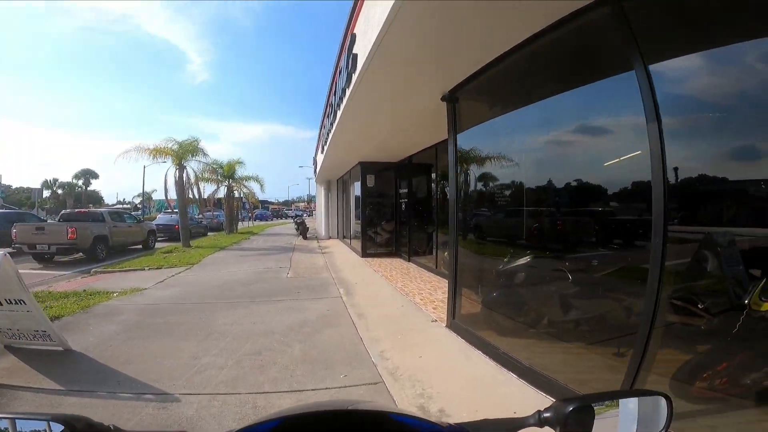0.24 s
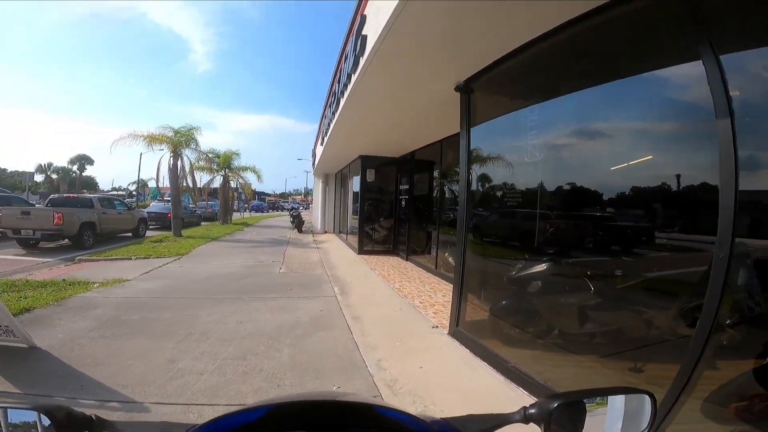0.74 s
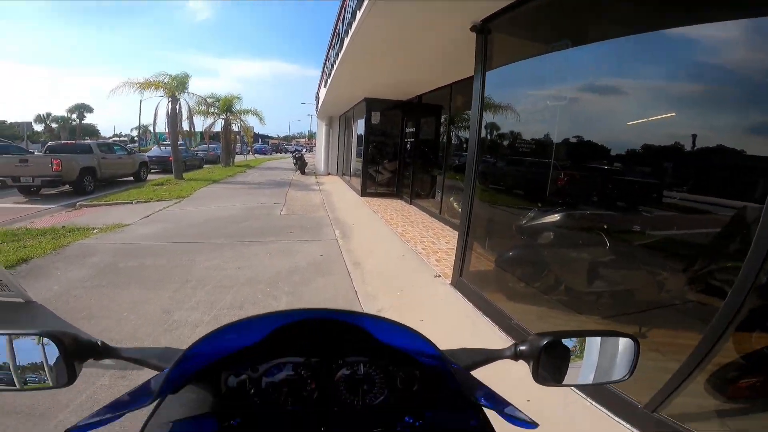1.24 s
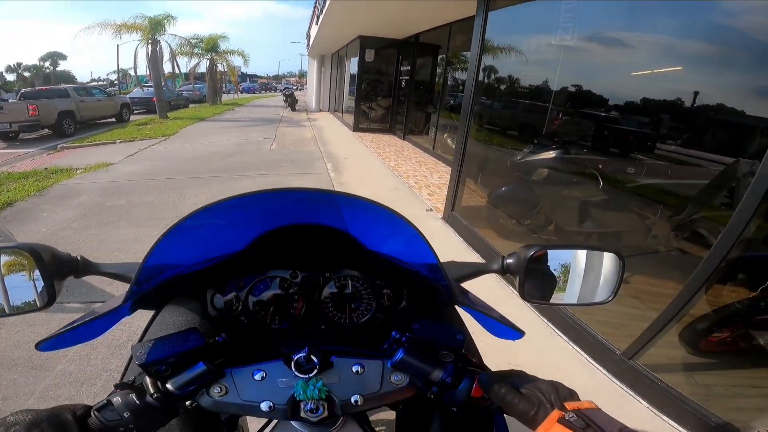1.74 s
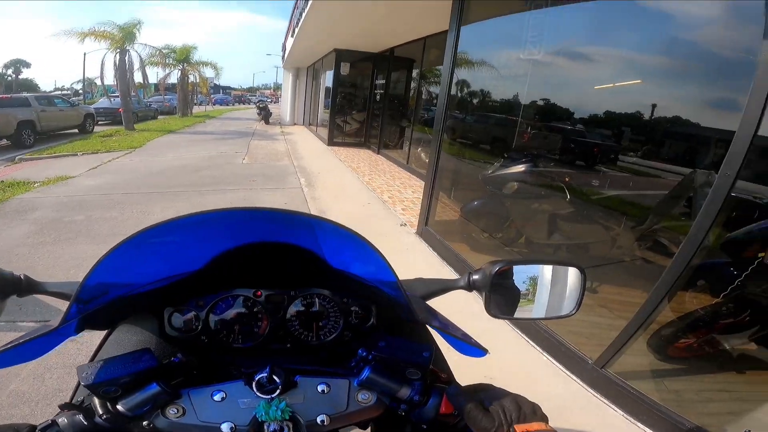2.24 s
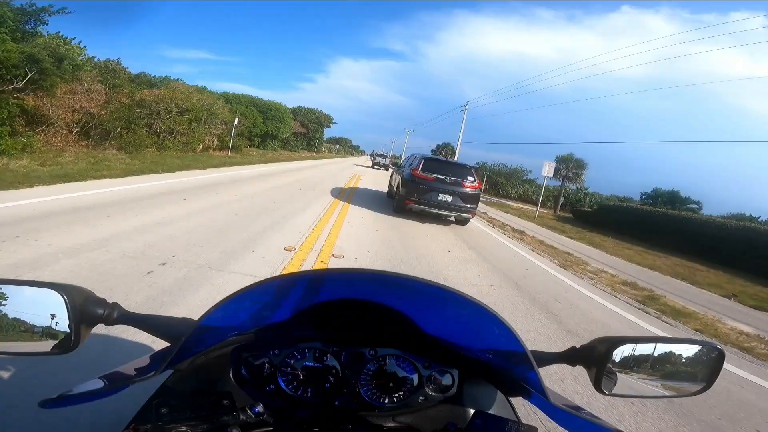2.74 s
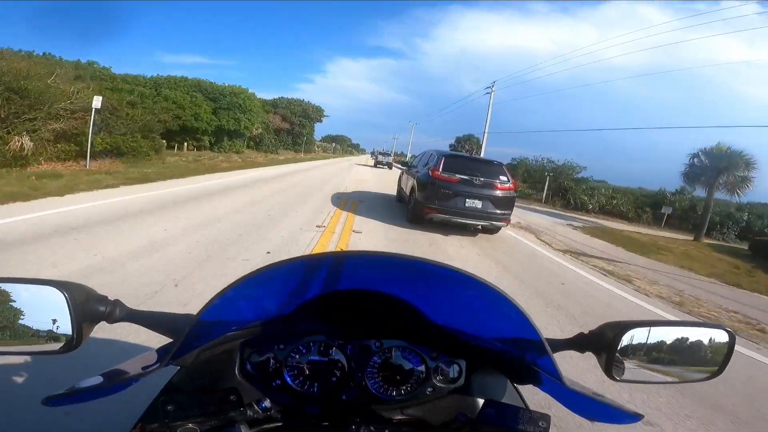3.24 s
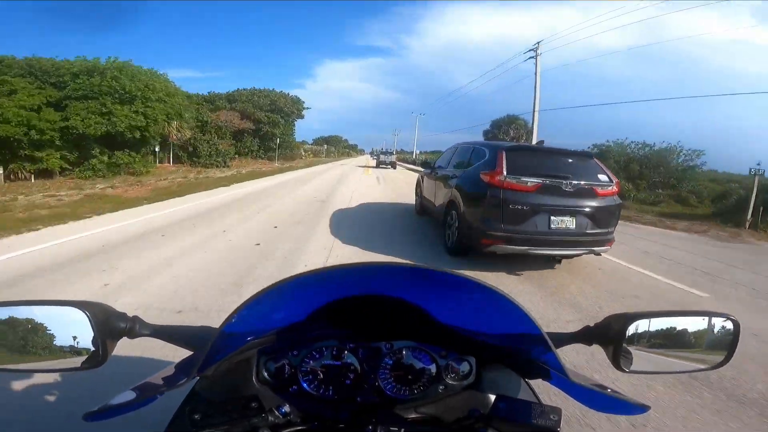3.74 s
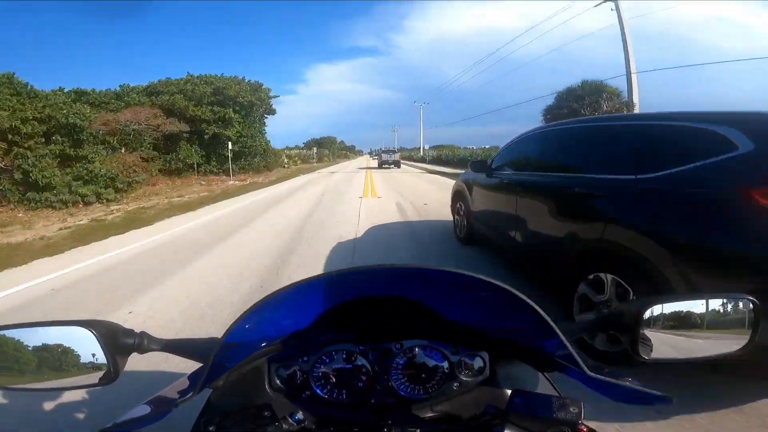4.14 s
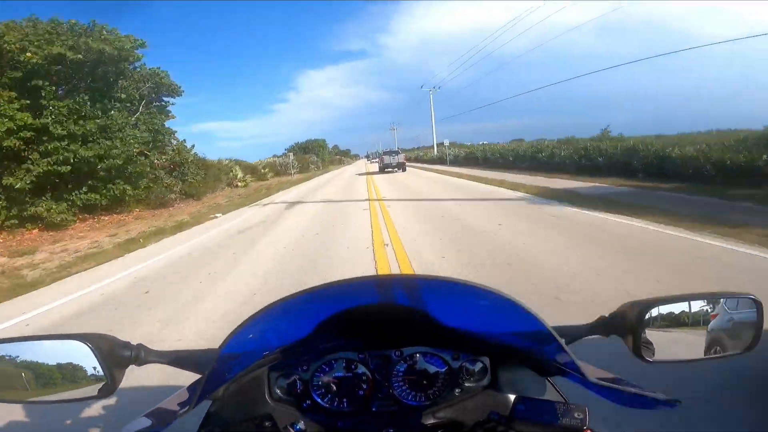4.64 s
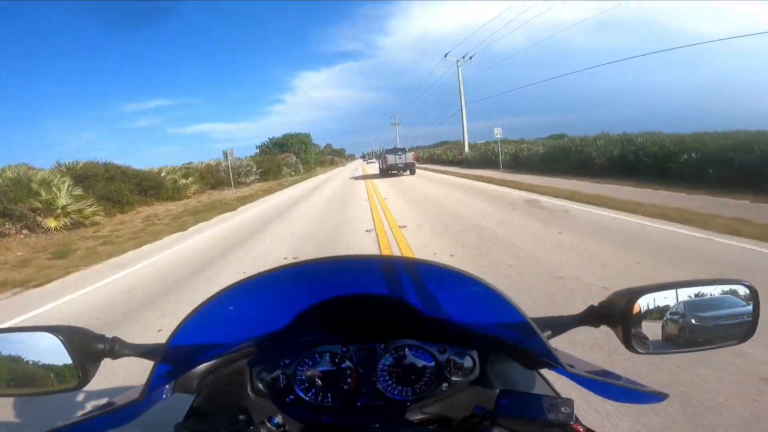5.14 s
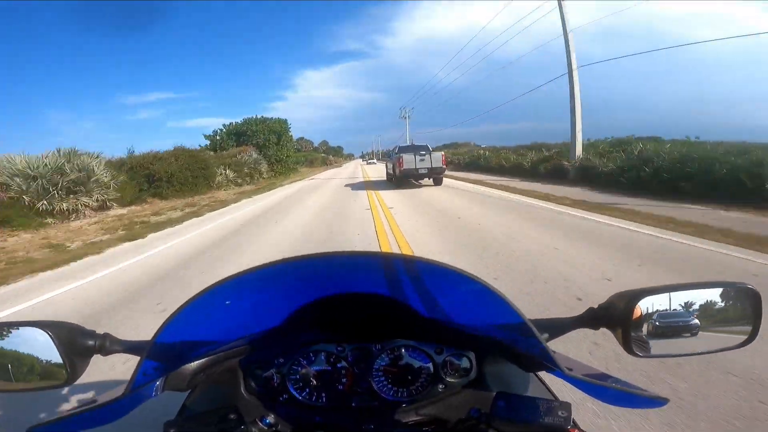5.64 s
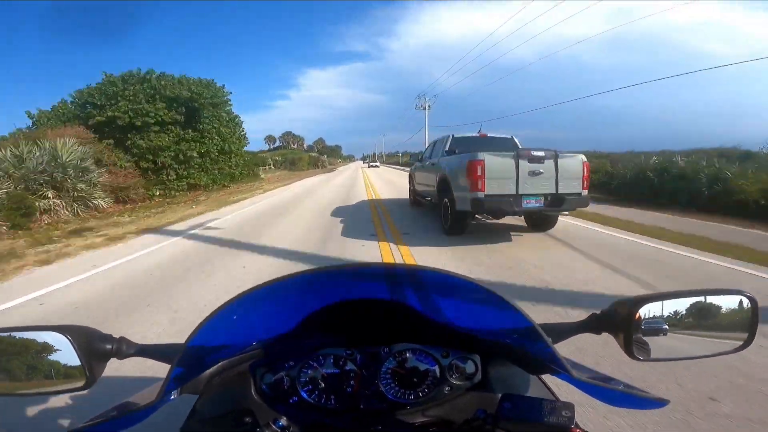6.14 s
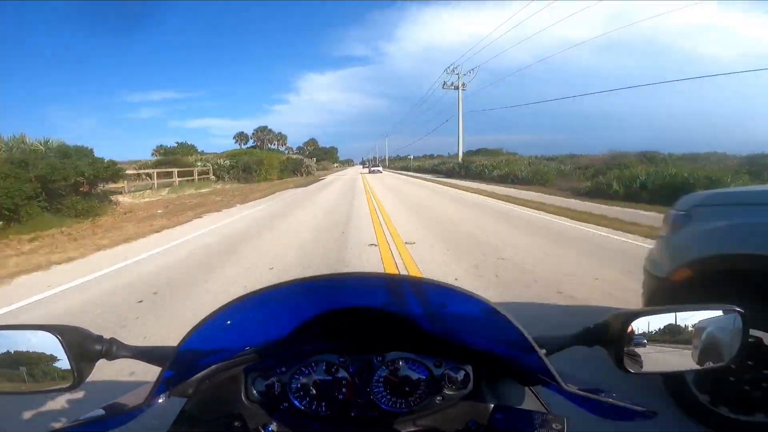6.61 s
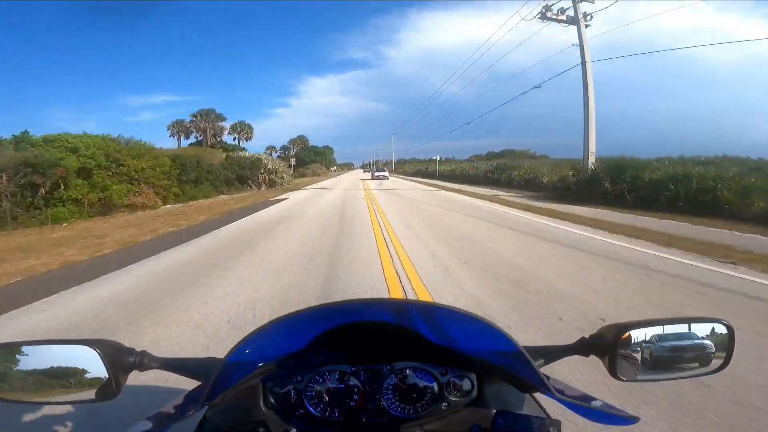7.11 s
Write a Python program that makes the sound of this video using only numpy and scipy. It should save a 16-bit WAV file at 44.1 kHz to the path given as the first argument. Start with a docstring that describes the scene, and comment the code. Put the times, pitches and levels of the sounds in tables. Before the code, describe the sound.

Heard from the rider's position: first a hunting, rumbling idle with irregular hollow barks over faint street wash, then a quick run-down, scraping, a faint squeak and a low throb ending in a click. A quarter-second of silence follows. Then a steady road pull, engine pitch climbing smoothly with throaty intake rasp, under heavy low wind buffeting and bright hiss that surges beside a car and a pickup.

```python
"""First a four-cylinder sport motorcycle idles by a shop front, with surges of bark and boom. It stops with
a tick and scrapes; a second, duller throb is left, then a low thump. After a cut it pulls hard on an open
road, then eases. Engine notes are sine waves locked to the turning engine; bark and rasp are pulses or noise
through resonances. Wind and street are filtered noise: wind buffets a microphone on the rider and hisses."""
import sys
import numpy as np
from scipy import signal
from scipy.fft import rfft, irfft
from scipy.io import wavfile
from scipy.ndimage import uniform_filter1d, minimum_filter1d

SR = 44100
rng = np.random.default_rng(int(sys.argv[2]) if len(sys.argv) > 2 else 0)


def unload_audio(sound):
    """Save the sound as a 16-bit wav file, at the path given as the first command line argument."""
    columns = np.transpose(np.atleast_2d(sound))
    # keep every value between -1 and 1, then stretch to whole-number steps
    steps = np.round(np.clip(columns, -1, 1) * 32767)
    wavfile.write(sys.argv[1], SR, steps.astype(np.int16))


N = 325017
T = np.arange(N) / SR  # time [s]
CUT_S, RIDE_S = 2.77, 3.015  # end of the first scene, start of the ride


def amp(db):
    """Turns decibels into a gain."""
    return np.exp(np.asarray(db) * (np.log(10) / 20))


def unit(x):
    """Scales a sound to rms 1."""
    return x / np.sqrt(np.mean(x ** 2) + 1e-20)


def noise():
    """Plain white noise, as long as the sound."""
    return rng.standard_normal(N)


def curves(rows):
    """Draws each column of a table as a curve over time."""
    s, *columns = np.transpose(rows)
    return [np.interp(T, s, column) for column in columns]


def colour(x, points, band=None):
    """Filters a sound by a spectrum; its rms becomes 1 overall, or 1 within a band."""
    hz = np.fft.rfftfreq(N, 1 / SR)
    f, db = np.transpose(points)
    z = rfft(x) * amp(np.interp(np.log(hz + 1), np.log(f + 1), db))
    inside = 1 if band is None else (hz > band[0]) & (hz < band[1])
    return irfft(z, N) * N / np.sqrt(2 * np.sum(abs(z * inside) ** 2))


def drift(hz):
    """Wanders at random with rms about 1; changes faster than the given rate are weakened."""
    knots = rng.standard_normal(N // 32 + 2)
    f = np.fft.rfftfreq(len(knots), 32 / SR)
    slow = irfft(rfft(knots) / np.sqrt(1 + (f / hz) ** 6), len(knots))
    return np.interp(T, np.linspace(0, T[-1], len(knots)), unit(slow))


def ring(x, modes):
    """Passes a sound through a set of resonances, at rms 1."""
    hz = np.fft.rfftfreq(N, 1 / SR) + 1e-3
    body = 0
    for k, (f, width, db) in enumerate(modes):
        sign = (-1) ** k
        body = body + sign * amp(db) / (1 + 1j * (hz ** 2 - f ** 2) / (hz * width))
    top = max(f for f, width, db in modes)
    treble_cut = 1 + (hz / (2 * top)) ** 4
    return unit(irfft(rfft(x) * body / treble_cut, N))


def firings(count_up, cylinders, scatter):
    """One click at each whole count; the cylinders differ, and so does each burn."""
    at = np.flatnonzero(np.diff(np.floor(count_up)) > 0)
    # share each click between two samples, so that it can fall between them
    late = (count_up[at + 1] % 1) / (count_up[at + 1] - count_up[at])
    size = np.resize(cylinders, len(at)) * (1 + scatter * rng.standard_normal(len(at)))
    out = np.zeros(N)
    out[at], out[at + 1] = size * late, size * (1 - late)
    return out


def tone(turns):
    """A sine of rms 1."""
    return np.sqrt(2) * np.sin(2 * np.pi * turns)


def burst(s, db, decay):
    """Level of a quick rise and an exponential fall."""
    age = np.maximum(T - s, 0)
    return amp(db) * (1 - np.exp(-age / 0.002)) * np.exp(-age / decay)


def swell(s, rise, fall, height):
    """A smooth hump with its own rise and fall."""
    return height * np.exp(-((T - s) / np.where(T < s, rise, fall)) ** 2)


# the hunting idle speed: (time [s], rate [firings per s])
IDLE_SPEED = [(0, 38.3), (.2, 36.5), (.3, 37.2), (.4, 39.8), (.53, 40.4), (.68, 39.3), (.8, 37.4),
              (1, 36.7), (1.15, 40.2), (1.3, 40.2), (1.49, 36.6), (1.68, 39), (1.85, 37.3), (1.95, 37.2),
              (2.08, 40.2), (2.2, 40)]
# surges of hard burning at walking pace: (start [s], length [s], strength [about 0-1])
SURGES = [(0.093, 0.097, 1), (0.362, 0.058, 0.98), (.5, 0.29, 0.5), (0.913, 0.067, 0.8),
          (1.088, 0.07, 0.94), (1.201, 0.034, 0.6), (1.302, 0.036, 0.6), (1.406, 0.081, 1),
          (1.585, 0.076, 1), (1.729, 0.082, 1.1), (2.015, 0.055, 1), (2.114, 0.063, 0.64)]
# idle exhaust resonances: (pitch [Hz], width [Hz], level [dB])
BARK = [(225, 45, -5), (282.6, 10, 4.5), (399, 67, -14)]
# a deeper resonance that grows as the bike rolls on: (pitch [Hz], width [Hz], level [dB])
DEEP_BARK = [(243, 14, 0)]
# tone colour of the valve gear: (pitch [Hz], level [dB per Hz])
CLATTER = [(200, -12.5), (330, -0.5), (410, -3.5), (520, -12), (600, -19.5), (850, -15), (1050, -9.5),
           (1550, -19.5), (1730, -14.5), (1950, -19), (2850, -21.5), (4100, -30.5), (5400, -39),
           (7800, -46), (10500, -57), (15000, -80.5)]
SURGE_RISE_S = .035
STOP_S, RUN_DOWN_HZ_PER_S = 2.2, 34  # the ignition is cut and the engine runs down
FIRING_DB, FIRING_FADE_DB_PER_S = -18.7, 130
OCTAVE_DB, OCTAVE_FADE_DB_PER_S = -22, 7.5  # the even multiples weaken as the bike rolls on
LOPE_DB, LOPE_DB_PER_S = -27, 8.5  # and the unevenness of the firings grows louder
PIPE_HZ, PIPE_WIDTH_HZ = 98.1, 25  # the pipe booms when three times the firing rate meets it
PIPE_DB, PIPE_FADE_DB_PER_S = -15.5, 93
BARK_DB, BARK_FADE_DB_PER_S = -37.5, 139
BARK_SURGE_DB, PIPE_SURGE_DB = 5.5, -4.5  # a surge opens the bark and chokes the boom
DEEP_BARK_DB, DEEP_BARK_FROM_S = -1, .8
CLATTER_DB, CLATTER_FADE_DB_PER_S = -51.5, 45


def idle():
    """Firings set the low tones; surges open the bark, the pipe booms between, valve gear clatters in step."""
    surge = np.zeros(N)
    for s, length, strength in SURGES:
        inside_s = np.minimum(T - s, s + length - T)
        surge += strength * np.clip(inside_s / SURGE_RISE_S + .5, 0, 1)
    stopped = np.clip(T - STOP_S, 0, 1)  # seconds of running down
    rate = curves(IDLE_SPEED)[0] - RUN_DOWN_HZ_PER_S * stopped
    count_up = np.cumsum(rate * (1 + .007 * drift(14))) / SR  # firings so far

    octaves = tone(2 * count_up) + amp(-5.5) * tone(4 * count_up)
    low = amp(FIRING_DB) * tone(count_up)
    low += amp(OCTAVE_DB - OCTAVE_FADE_DB_PER_S * T) * octaves
    low *= amp(-FIRING_FADE_DB_PER_S * stopped)

    lope = firings(count_up, [.6, -1, .8, -.4], scatter=.7)  # each firing's departure from the average
    lope_level = amp(LOPE_DB + LOPE_DB_PER_S * np.minimum(T, STOP_S))
    in_tune = 1 / np.hypot(1, 2 * (3 * rate - PIPE_HZ) / PIPE_WIDTH_HZ)
    boom = in_tune * tone(3 * count_up) * (1 + .2 * drift(12))
    boom += lope_level * ring(lope, [(104, 46, 4.5), (162.0, 93, -3.5)])
    boom *= amp(PIPE_DB + PIPE_SURGE_DB * surge - PIPE_FADE_DB_PER_S * stopped)

    puffs = unit(firings(count_up, [1.06, 0.78, 1.43, 0.87], scatter=0.25)) + .5 * noise()
    deep = amp(DEEP_BARK_DB) * np.clip((T - DEEP_BARK_FROM_S) / .3, .35, 1)
    bark = ring(puffs, BARK) + deep * ring(puffs, DEEP_BARK)
    bark *= amp(BARK_DB + BARK_SURGE_DB * surge - BARK_FADE_DB_PER_S * stopped)

    taps = 1 + 0.6 * np.exp(-(count_up % 1) / 0.083)  # a tap at each firing
    taps *= amp(0.35 * tone(count_up / 4) + 0.96 * drift(70))
    clatter = colour(taps * noise(), CLATTER, band=(2500, 5000))
    clatter *= amp(CLATTER_DB - CLATTER_FADE_DB_PER_S * stopped)
    return low + boom + bark + clatter


# the other engine's throb, then a low thump that swells just before the cut: (time [s], level [dB])
THROB_LEVEL = [(.8, -28), (1.15, -22), (1.8, -23), (2.2, -23), (2.42, -27), (2.49, -19), (2.56, -20),
               (2.62, -27), (2.71, -26), (2.76, -15)]
# tone colour of the street wash: (pitch [Hz], level [dB per Hz])
YARD = [(20, -17.5), (60, -14), (100, -23), (200, -34.5), (500, -44.5), (650, -47), (1500, -55),
        (2200, -63.5), (3000, -73.5), (4000, -72), (7500, -81.5), (11000, -101.5)]
THROB_HZ, YARD_DB = 47.8, -30


def yard():
    """A wavering low sine is another engine's dull throb, then a low thump; filtered noise is the street."""
    turns = np.cumsum(THROB_HZ * (1 + .012 * drift(5))) / SR
    turns += .25 - np.interp(CUT_S, T, turns)  # the cut falls on a crest, which clicks
    throb = tone(turns) + amp(-28.5) * tone(2 * turns)
    throb *= amp(curves(THROB_LEVEL)[0] + .5 * drift(5.0))
    return throb + amp(YARD_DB) * colour(noise(), YARD, band=(70, 10000))


# tone colour of the tick: (pitch [Hz], level [dB per Hz])
TICK = [(3000, -29), (5300, 3), (6500, 4), (7700, 0), (9000, -7), (11000, -13), (12500, -7), (15000, -27)]
# short scrapes as the engine stops: (time [s], level [dB], decay [s])
SCRAPES = [(2.348, -27, 0.037), (2.376, -36, 0.022), (2.394, -33.5, 0.026), (2.425, -31, 0.02)]
# tone colour of scrapes and rustle: (pitch [Hz], level [dB per Hz])
SCUFF = [(180, -13), (380, 0.5), (540, -9.5), (680, -19.5), (820, -10.5), (1100, -16.5), (1950, -19),
         (3500, -31), (5400, -42), (7900, -47), (11000, -68)]
# one soft rustle; a negative rise gives the same hump: (time [s], rise [s], fall [s], level [dB])
RUSTLE = (2.65, -0.05, .12, -46)
# the two notes of a thin squeak: (pitch [Hz], level [dB])
SQUEAK = [(4075, -72), (4953, -72)]
# when it squeaks: (time [s], rise [s], fall [s])
SQUEAK_SWELL = (2.55, 0.08, 0.11)
TICK_S, TICK_DB, TICK_DECAY_S = 2.119, -45, .011


def handling():
    """Short noise bursts tick and scrape as the engine comes to rest; two sines squeak, noise rustles."""
    tick = burst(TICK_S, TICK_DB, TICK_DECAY_S) * colour(noise(), TICK)
    s, rise, fall, db = RUSTLE
    scuff_level = sum(burst(*row) for row in SCRAPES) + swell(s, rise, fall, amp(db))
    scuffs = scuff_level * colour(noise(), SCUFF)
    squeak = np.zeros(N)
    for hz, db in SQUEAK:
        squeak += swell(*SQUEAK_SWELL, amp(db)) * tone(hz * T + 0.06 * drift(40))
    return tick + scuffs + squeak


# speed of the engine on the road: (time [s], crankshaft speed [turns per s])
CRANK = [(3.0, 63.13), (3.2, 64.66), (3.45, 67.03), (3.7, 69.69), (3.95, 72.7), (4.2, 75.86), (4.5, 79.48),
         (4.8, 83.19), (5.1, 86.86), (5.5, 91.4), (6.05, 98.6), (6.55, 104.24), (6.85, 105.69),
         (7.35, 107.55)]
# exhaust orders, notes locked to the crank: (multiple of crank speed, level [dB])
EXHAUST_ORDERS = [(2, 0), (3, -14), (4, 0), (6, -3)]
# silencer response: (pitch [Hz], level of an order that lies there [dB])
SILENCER = [(135, -16), (152, -22), (175, -21), (200, -27), (213, -14), (235, -31), (258, -35), (280, -30),
            (302, -22), (345, -23), (392, -19.5), (411, -22), (421, -33), (520, -39.5)]
# the third order stands out as the throttle eases: (time [s], rise [s], fall [s], boost [dB])
THIRD_SWELL = (6.4, 0.83, 0.2, 13.4)
EXHAUST_WAVER_DB = .9


def engine():
    """Two firings a turn: low exhaust orders move through the silencer's resonances, under the intake."""
    crank_hz, = curves(CRANK)
    turns = np.cumsum(crank_hz * (1 + .0015 * drift(18))) / SR
    exhaust = np.zeros(N)
    for k, db in EXHAUST_ORDERS:
        silencer_db = np.interp(k * crank_hz, *np.transpose(SILENCER))
        level = db + silencer_db + EXHAUST_WAVER_DB * drift(21)
        if k == 3:
            level += swell(*THIRD_SWELL)
        exhaust += amp(level) * tone(k * turns + rng.random())
    return exhaust + intake(turns, crank_hz)


# throttle, heard as the loudness of howl and rasp: (time [s], level [dB])
THROTTLE = [(3.1, 1), (3.3, -1), (3.55, 1.5), (3.85, -1), (4.15, -3), (4.6, 1.5), (5.05, 2), (5.35, 1),
            (5.85, -1), (6.15, -3), (6.5, 0), (6.85, -7), (7.37, -6)]
# airbox response: (pitch [Hz], level of an engine order that lies there [dB])
AIRBOX = [(300.0, -34.0), (360.0, -35.5), (400.0, -30.0), (430.0, -37.5), (470.0, -34.5), (530.0, -37.5),
          (565.0, -45.5), (620.0, -41.0), (660.0, -46.5), (700.0, -49.0), (770.0, -48.5), (815.0, -42.0),
          (850.0, -43.0), (885.0, -44.0), (915.0, -50.5), (950.0, -40.5), (985.0, -43.5), (1035.0, -39.5),
          (1080.0, -40.5), (1130.0, -50.0), (1200.0, -53.0), (1260.0, -50.5), (1310.0, -47.0),
          (1380.0, -54.0), (1560.0, -56.5), (1660.0, -54.0), (1740.0, -49.5), (1800.0, -50.5),
          (1880.0, -57.0), (2400.0, -55.5), (3400.0, -55.5)]
# shape of the intake pulses: (multiple of crank speed, level [dB])
INTAKE_ORDERS = [(4.5, -5), (7, -2), (9, -1), (12, 2), (15, 2), (17, 0), (26, -2)]
# orders that sing out for a moment: (time [s], half length [s], multiple of crank speed, level [dB])
FLARES = [(3.14, .13, 16, -35), (3.15, .13, 13.5, -33), (3.19, .16, 16.5, -34.5), (3.34, .28, 7, -30),
          (3.36, .31, 5, -31), (3.4, .34, 8, -29.5), (3.42, .18, 13, -31), (3.45, .16, 14, -32),
          (3.53, .22, 14.5, -34), (3.7, .24, 15, -30), (3.7, .3, 12, -33.5), (3.93, .22, 7, -33),
          (4.3, .3, 5, -33), (4.3, .22, 13.5, -35), (4.3, .25, 12, -37), (4.6, .16, 13, -29.5),
          (4.7, .28, 10, -33.5), (4.7, .2, 8, -33), (4.94, .31, 9.5, -33), (5.02, .28, 12, -28),
          (5.08, .3, 15, -36), (5.36, .18, 11, -34), (5.57, .24, 10.5, -35.5), (5.7, .5, 5, -35),
          (5.84, .28, 11, -34.5), (6.3, .25, 13, -40), (6.45, .18, 10, -35.5)]
# a higher airbox ring: (pitch [Hz], width [Hz], level [dB])
WHINE = [(1656, 70, 0), (1773, 70, 0.5)]
# it sounds while the engine lugs at low speed: (time [s], rise [s], fall [s], level [dB])
WHINE_SWELL = (3.55, .9, .4, -35)
# resonances of the intake rasp: (pitch [Hz], width [Hz], level [dB])
RASP = [(517, 66, -6.5), (893, 110, -4), (1023, 100, 8), (1320, 90, -4.5), (1764, 90, -3)]
HOWL_DB, HALF_ORDER_DB, RASP_DB = -1.5, -4, -38.5
WAVER_DB = 1.8  # the orders swell slowly
GRAIN_RAD, GRAIN_HZ = .25, 22  # and uneven burns roughen them by shaking their phase


def intake(turns, crank_hz):
    """Unequal cylinders give notes at half orders too; they sweep the airbox, and gulps of air rasp."""
    howl = np.zeros(N)
    throttle = amp(curves(THROTTLE)[0])
    wavers = [amp(WAVER_DB * drift(5)) for _ in range(13)]  # shared out among the orders
    grains = [GRAIN_RAD * drift(GRAIN_HZ) for _ in range(11)]
    turns = turns + 0.0018 * drift(40)  # the crank runs a little unevenly
    for half in range(9, 53):
        k = half / 2
        if k == 6:  # this order is played by the exhaust
            continue
        db = HOWL_DB + np.interp(k * crank_hz, *np.transpose(AIRBOX))
        db = db + np.interp(k, *np.transpose(INTAKE_ORDERS)) + HALF_ORDER_DB * (half % 2)
        flare = np.zeros(N)
        for s, width, order, top_db in FLARES:
            if order == k:
                flare += swell(s, width, width, amp(top_db))
        level = np.maximum(throttle * amp(db), flare) * wavers[half % 13]
        howl += level * tone(k * turns + rng.random() + grains[half % 11] / (2 * np.pi))

    gulps = noise() * np.exp(-(2 * turns % 1) / 0.62)  # air rasps at each gulp, two a turn
    pulses = unit(firings(2 * turns, [1.3, .7, 1.1, .9], scatter=.3))
    s, rise, fall, db = WHINE_SWELL
    whine = swell(s, rise, fall, amp(db)) * ring(pulses + gulps, WHINE)
    return howl + whine + throttle * amp(RASP_DB) * ring(gulps, RASP)


# borders between the bands of hiss: [Hz]
FLUTTER_EDGES_HZ = [0, 2500, 3400, 4500, 6500, 16000]
FLUTTER_DB, FLUTTER_HZ = 1.1, 60


def fluttering(x):
    """Small eddies make each band flutter separately."""
    hz, z = np.fft.rfftfreq(N, 1 / SR), rfft(x)
    out = np.zeros(N)
    for low, high in zip(FLUTTER_EDGES_HZ, FLUTTER_EDGES_HZ[1:]):
        band = irfft(z * (hz >= low) * (hz < high), N)
        out += band * amp(FLUTTER_DB * drift(FLUTTER_HZ))
    return out


# gusts, strongest in the wakes of a car and a truck:
# (time [s], rise [s], fall [s], hiss change [dB], buffet change [dB])
GUSTS = [(3.151, 0.097, 0.15, -2, 4.5), (3.917, 0.016, 0.0091, 4, -3), (4.02, 0.014, 0.13, -1, -0.5),
         (4.4, 0.12, 0.035, -2, -1.5), (4.45, 0.5, 0.28, 5.5, 4.5), (5.05, 0.035, 0.12, -0.5, 3.5),
         (5.25, 0.38, 0.25, 5.5, 0.5), (5.67, 0.13, .07, 3, 4.5), (5.94, 0.08, 0.11, 2.5, 3.5),
         (6.42, 0.16, 0.26, 4.5, -2), (6.69, 0.1, 0.13, 5, 2.5), (6.86, 0.035, 0.026, 3.5, -3),
         (7.25, 0.051, 0.0099, 4, -1.5)]
# a dip in the buffeting that has barely begun when the sound ends:
# (time [s], rise [s], fall [s], change [dB])
BUFFET_DIP = (7.5, 0.04, 2, -3.5)
# tone colour of the buffeting: (pitch [Hz], level [dB per Hz])
BUFFET = [(12, -14.5), (35, -3.5), (60, -0.5), (110, -1.5), (180, -1), (250, -6), (350, -10.5),
          (480, -17.5), (700, -25.5), (1500, -50), (4000, -85.5)]
# tone colour of the rushing air: (pitch [Hz], level [dB per Hz])
RUSH = [(150, -6), (400, 4.5), (700, 0.5), (770, 0.5), (835, 3.5), (900, 0), (1070, 0.5), (1180, -1.5),
        (1320, -3), (1550, -6), (1780, -4), (1950, -8), (2150, -7), (2500, -11.5), (4000, -17), (9000, -55)]
# tone colour of the hiss: (pitch [Hz], level [dB per Hz])
HISS = [(1000, -25), (2300, -6), (2550, -7.5), (2850, 5), (3030, 0), (3200, 2.5), (3500, -1.5), (4150, 0),
        (4550, -6.5), (4850, -4), (5600, -11), (7400, -15.5), (8500, -22.5), (10000, -27.5), (11000, -39),
        (15000, -56.5)]
# levels in free air at the lowest speed, and what top speed adds
BUFFET_DB, RUSH_DB, HISS_DB = -22, -38, -44.5
BUFFET_SPEED_DB, RUSH_SPEED_DB, HISS_SPEED_DB = 5, -1, 0.1
RUSH_GUST_SHARE = 0.76  # of the hiss's swell


def wind():
    """Eddies buffet the microphone; air rushes round the fairing, and its hiss brightens with speed."""
    wake_db = sum(swell(s, rise, fall, db) for s, rise, fall, db, _ in GUSTS)
    thump_db = sum(swell(s, rise, fall, db) for s, rise, fall, _, db in GUSTS) + swell(*BUFFET_DIP)
    crank_hz, = curves(CRANK)
    speed = (crank_hz - crank_hz.min()) / np.ptp(crank_hz)  # 0 slowest, 1 fastest
    gust, flutter = drift(19.3), drift(160)

    buffet_db = BUFFET_DB + BUFFET_SPEED_DB * speed + thump_db + 0.12 * gust
    buffet = amp(buffet_db) * colour(noise(), BUFFET, band=(60, 300))

    rush_db = RUSH_DB + RUSH_SPEED_DB * speed + RUSH_GUST_SHARE * wake_db
    rush_db += 1.15 * gust + 1.33 * flutter
    rush = amp(rush_db) * colour(noise(), RUSH, band=(1400, 2400))

    eddies = fluttering(colour(noise(), HISS, band=(3000, 9000)))
    dull = signal.oaconvolve(eddies, signal.firwin(101, 7800, fs=SR), "same")
    bright = amp(-4.5 + 9.7 * speed) * (eddies - dull)  # the part above 7800 Hz
    hiss_db = HISS_DB + HISS_SPEED_DB * speed + wake_db + 0.65 * gust + 0.26 * flutter
    return buffet + rush + amp(hiss_db) * (dull + bright)


# the air behind the screen booms on closing up to each vehicle: (time [s], rise [s], fall [s], level [dB])
BOOMS = [(3.74, 0.099, 0.17, -22.5), (6.65, 0.33, 0.21, -17.5)]
# resonances of that pocket of air: (pitch [Hz], width [Hz], level [dB])
BOOM_RING = [(168.5, 90, -9.5), (207, 42, -4)]
BOOM_DB, BOOM_FROM_S = -30, 3.66  # steady boom once up to speed


def screen_boom():
    """Eddies ring the pocket of air behind the screen, most of all close behind a vehicle."""
    eddies = colour(noise(), [(60, -28.0), (125, -2.0), (240, -3.5), (500, -27.0)])
    level = amp(BOOM_DB) * np.clip((T - BOOM_FROM_S) / 0.27, 0, 1)
    level += sum(swell(s, rise, fall, amp(db)) for s, rise, fall, db in BOOMS)
    return level * ring(eddies, BOOM_RING)


def scene():
    """The idling scene ends abruptly; after a short silence the ride fades in."""
    standing = (idle() + yard() + handling()) * (T < CUT_S)
    fade = np.clip((T - RIDE_S) / 0.084, 0, 1) ** 1.46
    riding = fade * (engine() + wind() + screen_boom())
    return (standing + riding)[None]


EDGE_HZ = 15100  # treble limit


def record(dry):
    """A fast limiter gently rounds the peaks; then the highest treble is cut off."""
    ceiling = .64
    gain = 1 / (1 + (abs(dry[0]) / ceiling) ** 6) ** (1 / 6)
    gain = uniform_filter1d(minimum_filter1d(gain, size=301), size=301)
    low_pass = signal.firwin(511, EDGE_HZ, window=("kaiser", 9), fs=SR)
    return signal.oaconvolve(dry * gain, low_pass[None], "same")


dry = scene()
out = record(dry)
unload_audio(out)
```